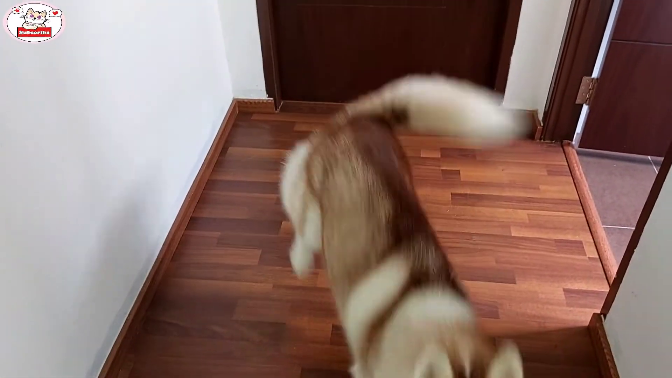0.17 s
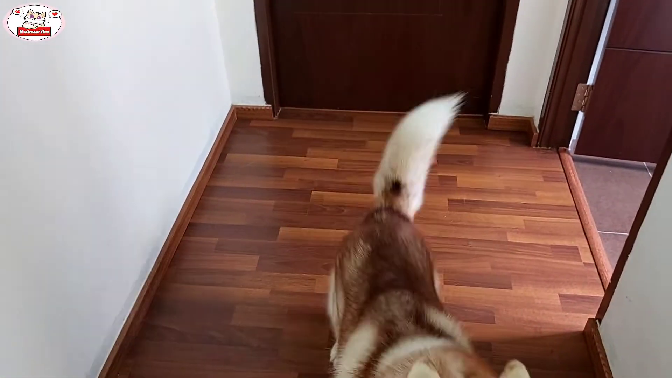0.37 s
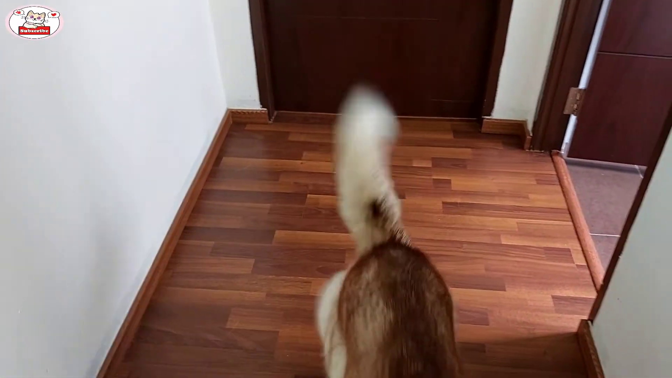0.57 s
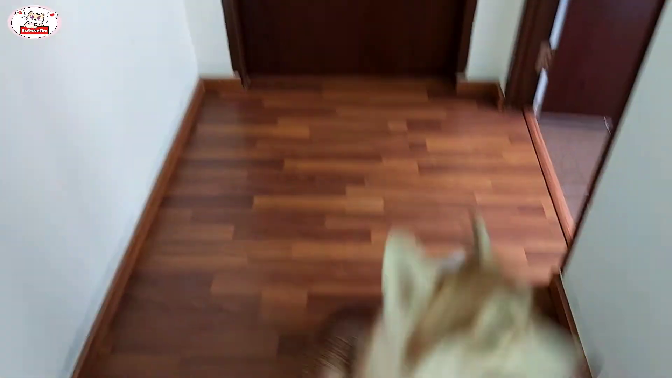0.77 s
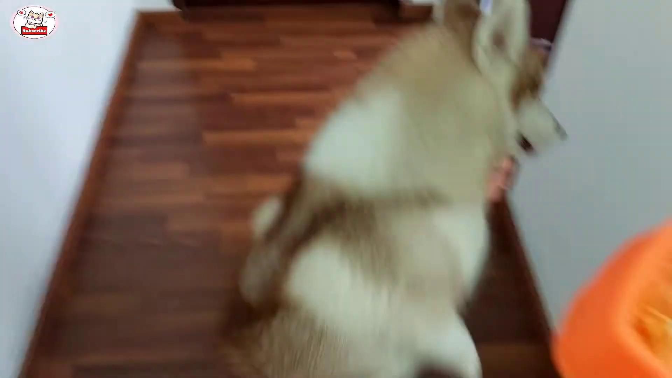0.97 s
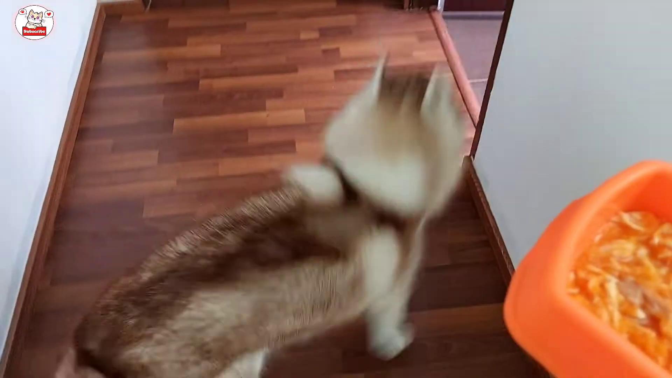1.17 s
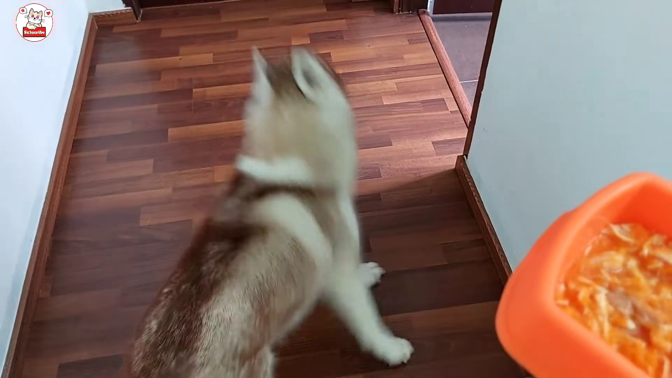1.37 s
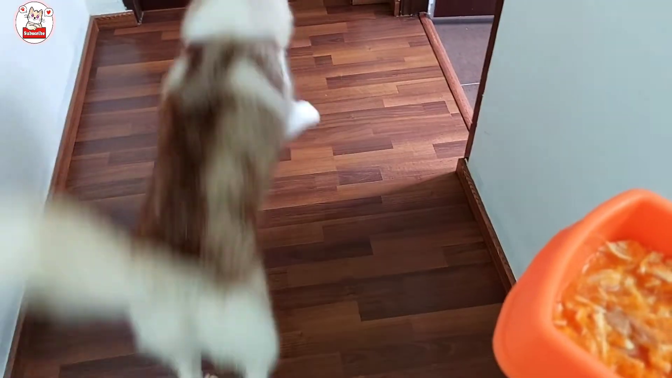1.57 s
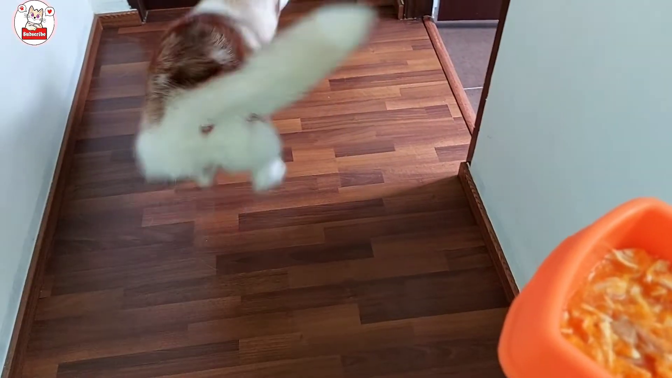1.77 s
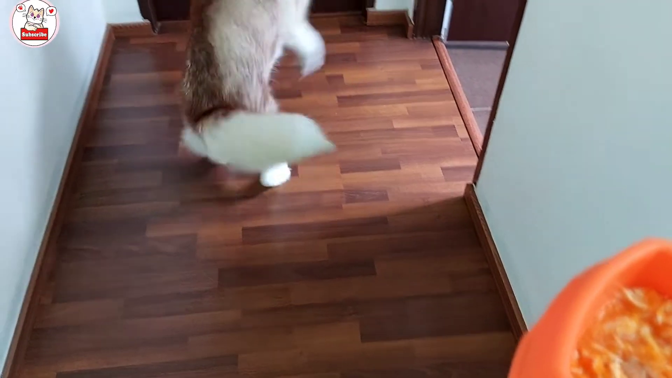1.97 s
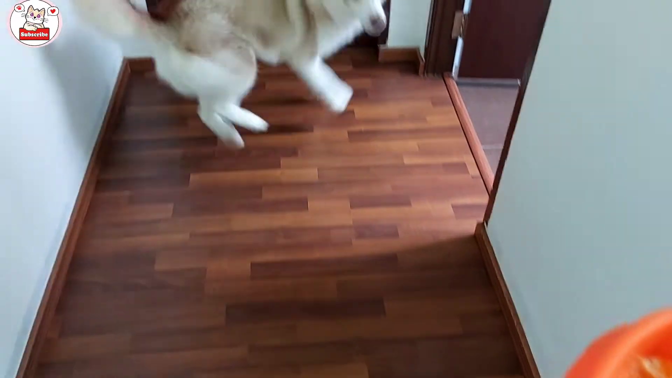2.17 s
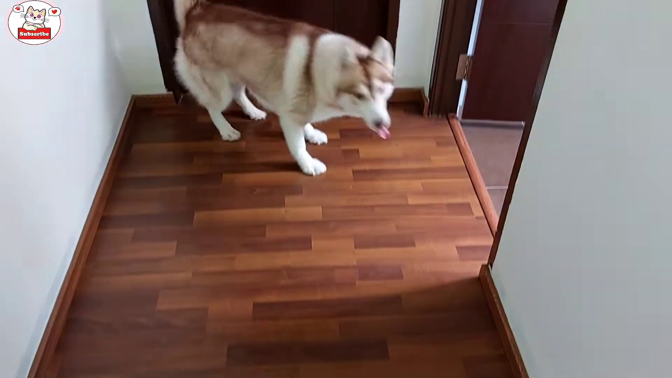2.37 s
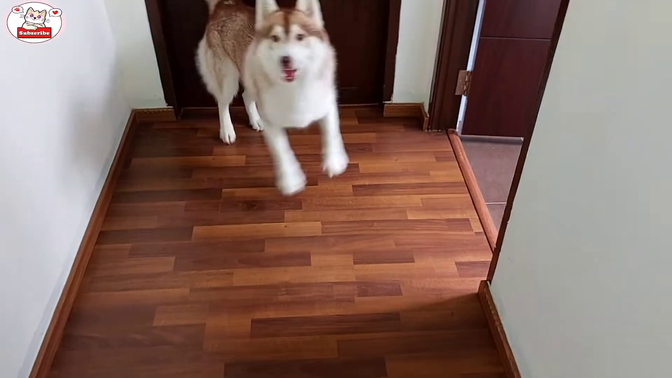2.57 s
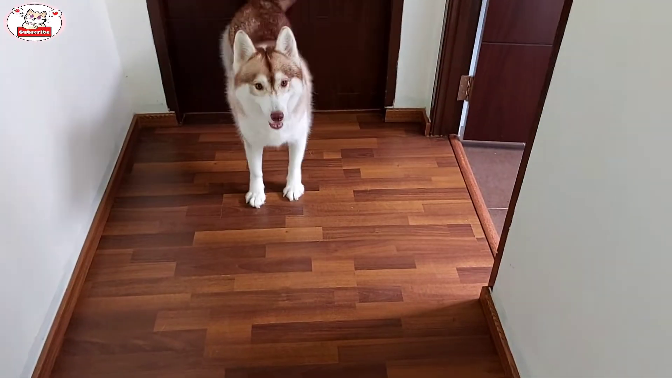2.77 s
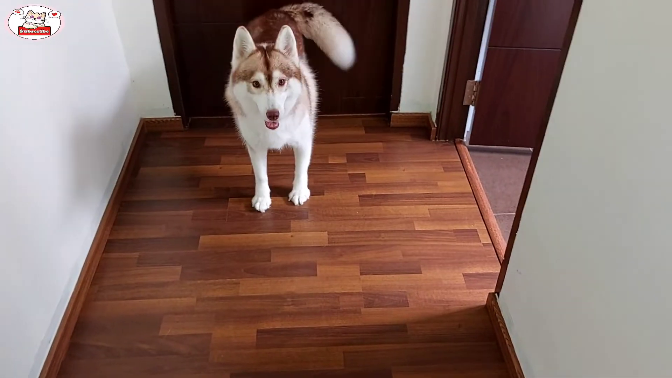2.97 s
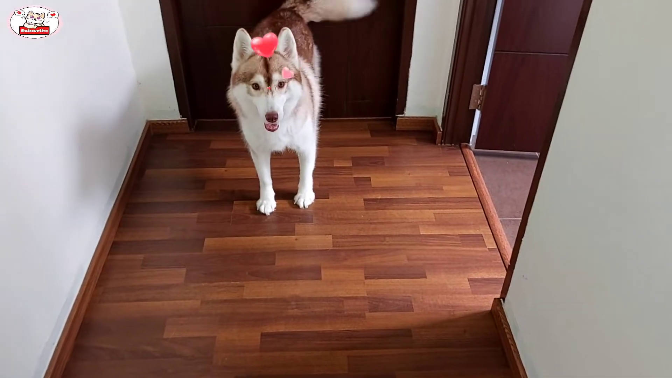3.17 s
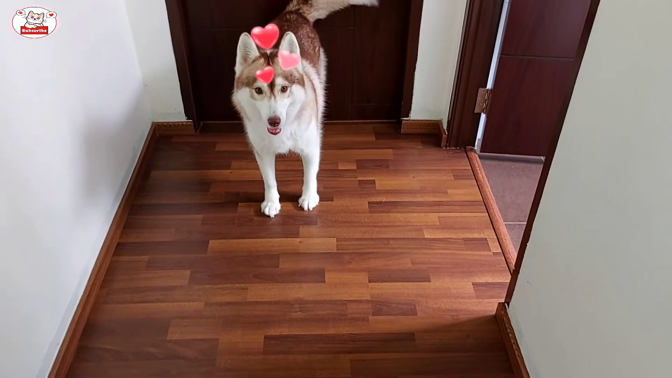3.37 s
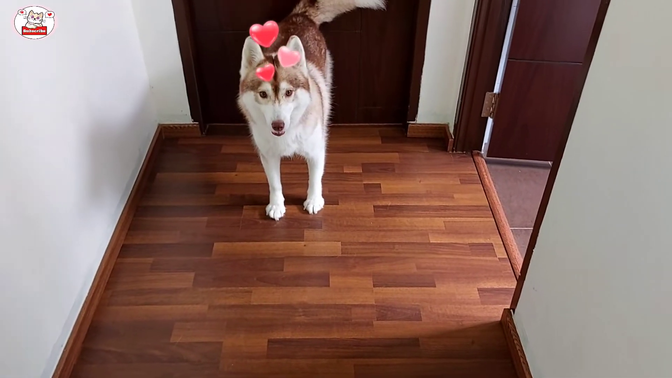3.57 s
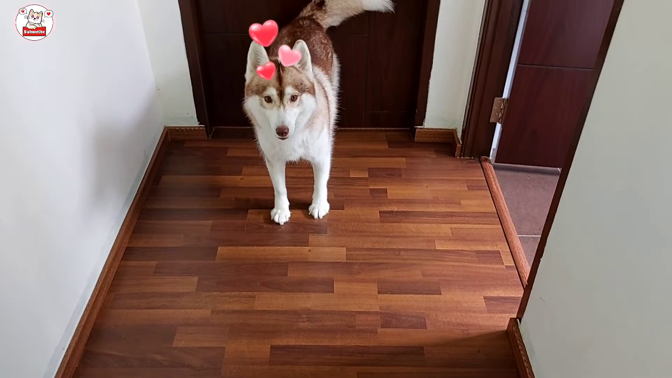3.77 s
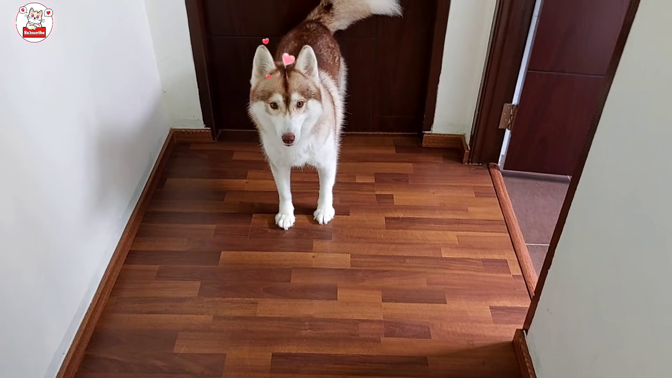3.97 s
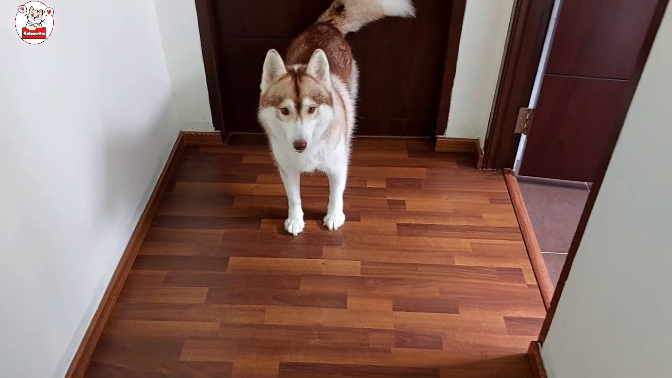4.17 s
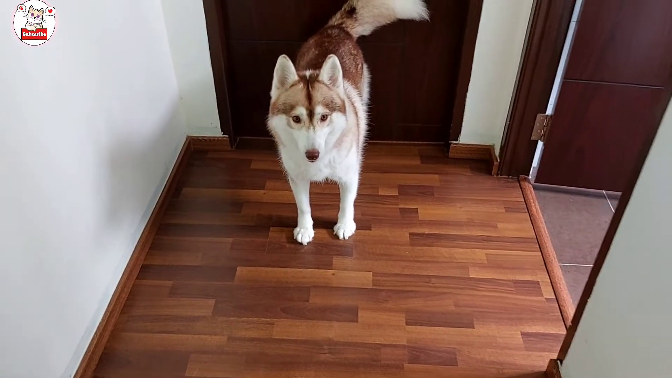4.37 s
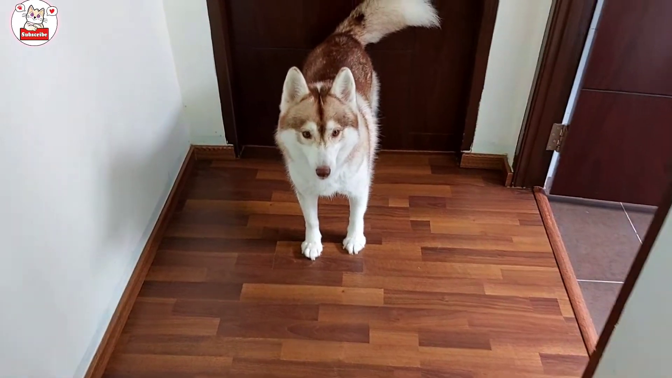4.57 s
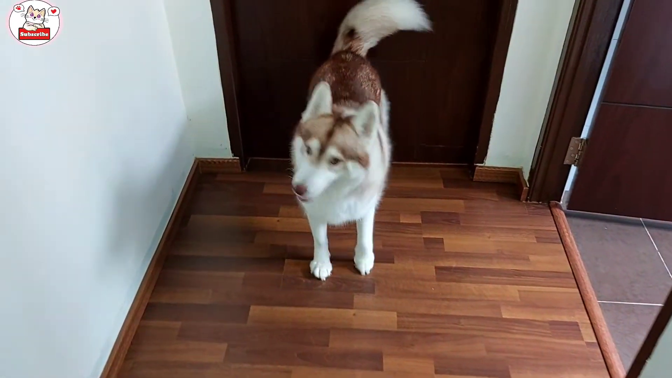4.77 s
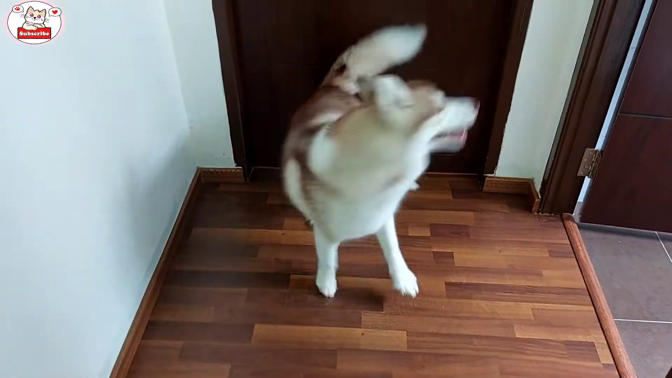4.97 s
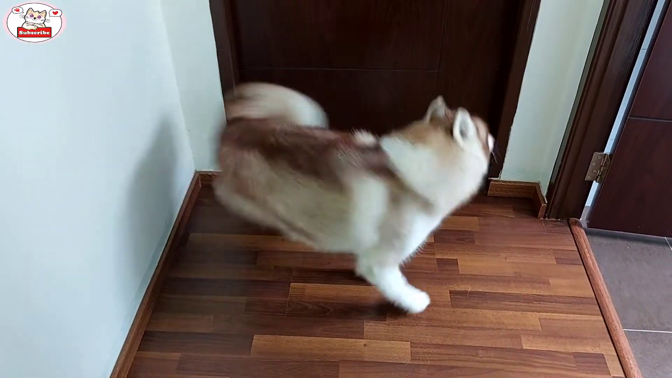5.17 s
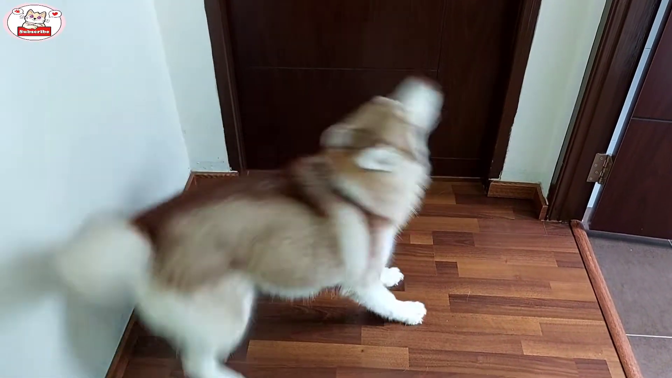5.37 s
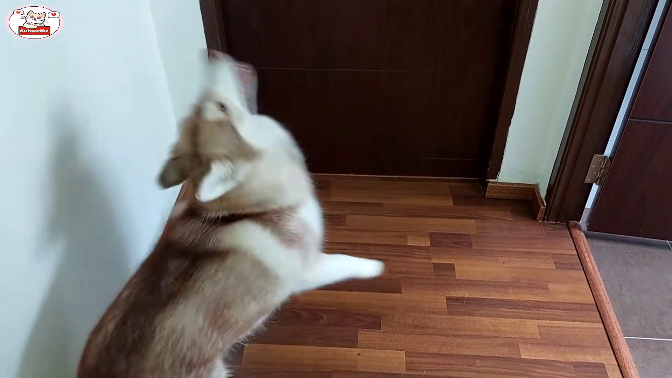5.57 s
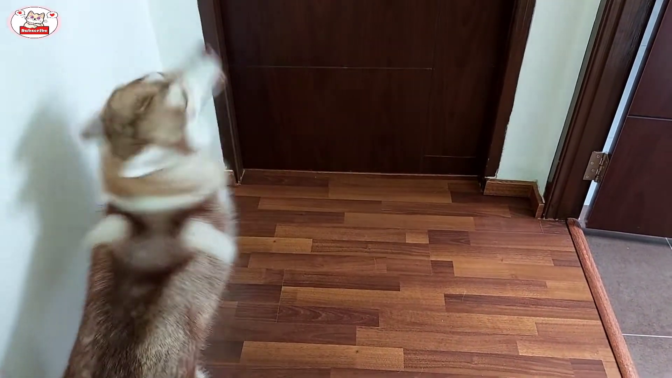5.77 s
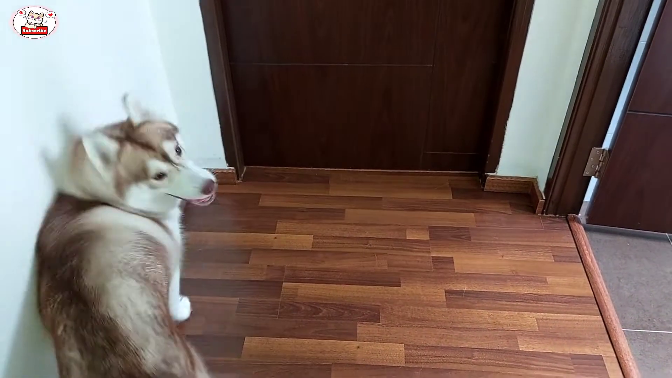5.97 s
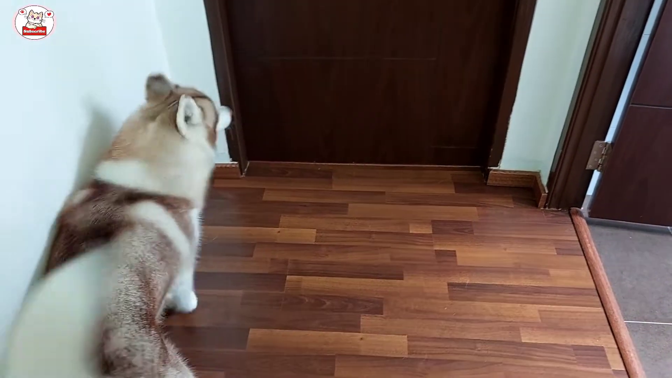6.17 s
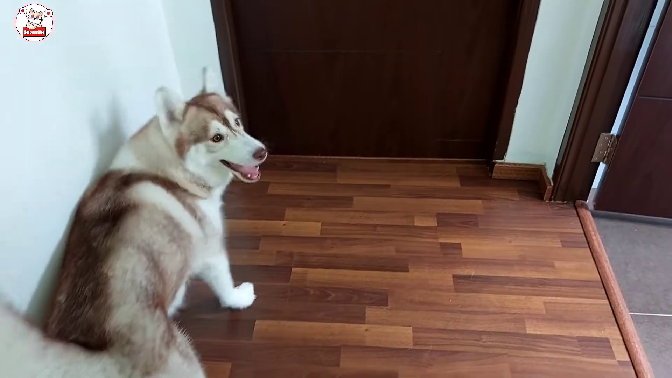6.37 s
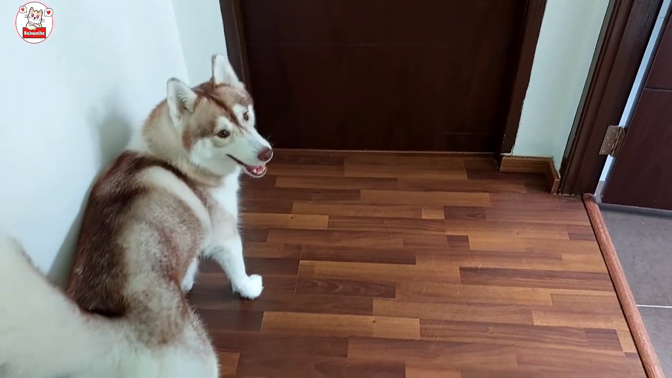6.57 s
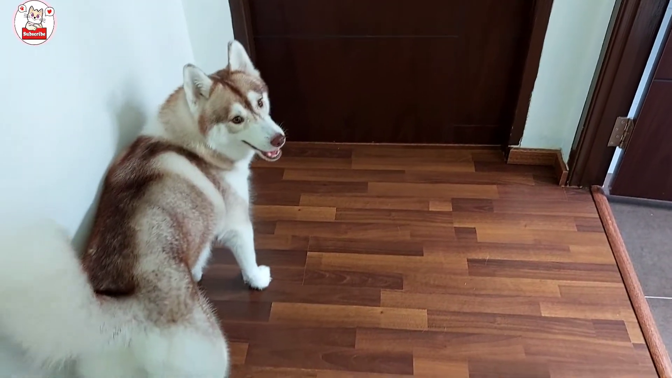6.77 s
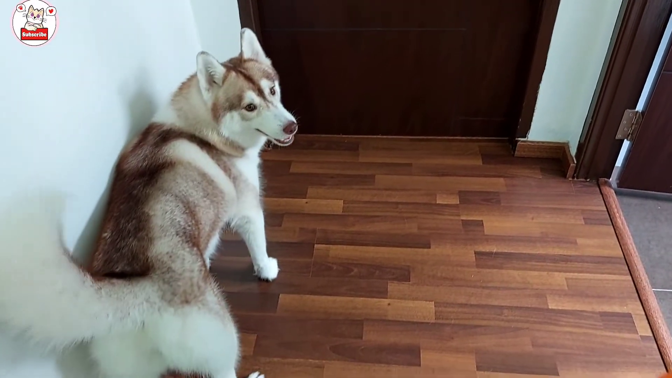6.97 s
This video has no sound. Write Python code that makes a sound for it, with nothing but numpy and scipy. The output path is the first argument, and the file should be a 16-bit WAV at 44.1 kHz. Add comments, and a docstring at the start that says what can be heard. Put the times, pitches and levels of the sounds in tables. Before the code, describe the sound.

A big husky spins and hops on laminate in a bare hallway. Sharp claw ticks, gritty skids, knocking paw pads and low floor booms come in an irregular flurry for about three seconds, with soft huffs. A near-silent pause leaves only low appliance hum, then a second, sparser scramble brings more huffs. Close stereo microphone, bright lively echo.

```python
"""Claws tick and skid on laminate as an excited dog spins and hops in a bare, echoing hallway.
A claw is a broadband impulse and scratch, a paw pad a blow that rings the boards, a slide a train of
random clicks, and a huff turbulent noise through throat and mouth resonances. The floor booms, diffuse
echo and standing waves answer, and an appliance hums over the air noise of the house.
Two microphone ports a hand apart hear it with small differences of level, delay and colour."""
import sys
import numpy as np
from scipy import signal
from scipy.fft import rfft, irfft
from scipy.io import wavfile

SR = 44100
rng = np.random.default_rng(int(sys.argv[2]) if len(sys.argv) > 2 else 0)


def file_out(sig):
    """Save sig as 16-bit WAV at sys.argv[1]."""
    # one column per channel
    cols = np.atleast_2d(sig).T
    # limit, then scale
    lim = np.clip(cols, -1, 1)
    pcm = np.round(lim * 32767).astype(np.int16)
    wavfile.write(sys.argv[1], SR, pcm)


N = 308700

# Relative spectral density of claw on laminate: (f/Hz, level/dB)
CLAW_SPECTRUM = [(530, -6), (900, 2.5), (1250, -6.5), (1880, -2.5), (3430, -1), (4860, 5), (6410, -1.5),
                 (11800, -5), (15100, -5), (16000, -53)]


def from_db(db):
    """Amplitude ratio of a level: 20 dB is a factor of ten."""
    return 10 ** (np.asarray(db) / 20)


def rms_one(x):
    """Normalisation to unit root-mean-square amplitude."""
    return x / np.sqrt(np.mean(x ** 2) + 1e-20)


def at_hz(points, hz):
    """Interpolation of a curve along logarithmic frequency."""
    points = np.array(points)
    return np.interp(np.log(hz), np.log(points[:, 0]), points[:, 1])


def drift(rate_hz):
    """Low-passed noise: a random fluctuation of unit spread, with a double pole at rate_hz."""
    step = 40                                   # samples between computed values
    warm_up = 2000                              # values dropped while the filter settles
    r = np.exp(-2 * np.pi * rate_hz * step / SR)
    white = rng.standard_normal(N // step + warm_up + 2)
    slow = signal.lfilter([1], [1, -2 * r, r * r], white)[warm_up:]
    return np.interp(np.arange(N) / step, np.arange(len(slow)), rms_one(slow))


def resonator(hz, width_hz):
    """Two-pole resonance: numerator and denominator for a gain of about 1 at the peak."""
    r = np.exp(-np.pi * width_hz / SR)
    zeros = [(1 - r * r) / 2, 0, (r * r - 1) / 2]
    return zeros, [1, -2 * r * np.cos(2 * np.pi * hz / SR), r * r]


def resonate(x, hz, width_hz):
    """Forced response of one fixed resonance."""
    return signal.lfilter(*resonator(hz, width_hz), x)


def moving_resonance(x, centre_hz, width_hz):
    """Time-varying resonance: its centre glides in steps of 256 samples and its state carries over."""
    state, y = np.zeros(2), np.zeros(N)
    for i in range(0, N, 256):
        zeros, poles = resonator(centre_hz[i], width_hz)
        y[i:i + 256], state = signal.lfilter(zeros, poles, x[i:i + 256], zi=state)
    return y


def ring(length, hz, t60):
    """Free damped vibration: a sine that falls by 60 dB in t60 seconds."""
    t = np.arange(length) / SR
    return np.sin(2 * np.pi * hz * t) * from_db(-60 * t / t60)


def grains(per_s, spread_db):
    """Poisson-like impulse train: random clicks of uneven size and either sign."""
    sizes = from_db(spread_db * np.minimum(rng.exponential(1, N), 5))
    sizes = sizes * rng.choice([-1, 1], N)
    return sizes * (rng.random(N) < per_s / SR) + 1e-9


def coloured(x, spectrum, tilt_db=0):
    """Spectral shaping: a curve plus a tilt in dB per octave, zero at 4 kHz and level below 1 kHz."""
    hz = np.maximum(np.fft.rfftfreq(len(x), 1 / SR), 10)
    tilt = tilt_db * np.log2(np.maximum(hz, 1000) / 4000)
    return irfft(rfft(x) * from_db(at_hz(spectrum, hz) + tilt), len(x))


def bands(length):
    """Spatial coherence of a diffuse field: half-octave stereo noise, more alike in bass than treble."""
    # Left-right correlation of diffuse sound: (f/Hz, correlation)
    likeness = [(60, 0.36), (130, 0.61), (250, 0.9), (500, 0.54), (1000, 0.12), (4000, 0.014)]
    white = rng.standard_normal((2, 2, length))       # neighbouring bands take turns at two noises
    edges = 25 * 2 ** np.arange(0, 9.6, .5)
    for k, (low, high) in enumerate(zip(edges, edges[1:])):
        band_pass = signal.butter(2, [low, high], "band", fs=SR, output="sos")
        mid, side = signal.sosfilt(band_pass, white[k % 2])
        hz = np.sqrt(low * high)
        alike = np.clip(at_hz(likeness, hz), -1, 1)
        yield hz, np.sqrt(1 + alike) * mid + np.sqrt(1 - alike) * side * [[1], [-1]]


def swell(start, length, attack_s, t60):
    """Envelope of one effort: squared rise, hold until its length is over, exponential decay."""
    age = np.arange(N) / SR - start
    decay = from_db(-60 * np.maximum(age - length, 0) / t60)
    return np.clip(age / attack_s, 0, 1) ** 2 * decay


def claws():
    """Impulse excitation: each strike is a sharp crack and a gritty scratch that swells and dies.
    Returns what reaches the two ports and the blow that fills the hall."""
    # Claw strikes: (t/s, relative strength/dB, lean to the left/dB before clipping and port weights,
    # tilt/dB per octave)
    strike_list = [(0.023, -17.5, -5, -4), (0.129, -1.5, -2, -1.5), (0.3106, -4.5, 2.5, -1),
                   (0.384, -13, -2, -1), (0.5314, -6, -2, 0), (0.67, -17.5, 3, 7),
                   (0.7108, 0.5, -0.5, -0.5), (0.746, -5, 1, 1), (0.886, -13.5, 9, -0.5),
                   (1.051, -11.5, 6, -2), (1.2005, 3, 3, 0), (1.205, -10.5, 6.5, -2.5),
                   (1.613, -16.5, -1.5, -1.5), (1.6826, -1, 5, -2), (1.711, -9.5, 6, -1),
                   (1.9149, -11.5, 0, -4), (1.921, -5.5, -5.5, 1.5), (2.0454, -11, 0, -1.5),
                   (2.057, -4, -4, 0.5), (2.1499, -16, -4.5, -2), (2.2349, -4.5, 7.5, -1),
                   (2.245, 1.5, 5, -0.5), (2.652, -5, -3, 0), (2.673, -0.5, 3, 0), (2.7796, -15.5, 0, -4),
                   (3.0149, -15.5, -1, -2), (4.044, -56, 5, 1.5), (4.9301, -10, -0.5, -4.5),
                   (5.007, -9, -2, -1.5), (5.1108, -9.5, -3, 0), (5.1679, -10, -4, -1.5),
                   (5.223, -3.5, 2, -0.5), (5.4044, -11.5, -0.5, -1), (5.4266, -2.5, -2.5, 0),
                   (5.9874, -8.5, 6, 1), (6.036, -6.5, -10.5, -4), (6.0706, 1.5, 2.5, 1),
                   (6.334, -2, 2, -1)]
    scratch_s, grit_db = .007, 8      # decay time and unevenness of the scratch
    scratch_db = 4.5                  # energy of the scratch against the crack
    lag_s_per_db = .00003
    size, lead = 2048, 128
    out = np.zeros((3, N + size))
    t = np.arange(size) / SR
    age = t / scratch_s
    crack = (t == 0) * 1.
    whole = crack * np.hypot(1, from_db(scratch_db))      # the energy of both, in one blow
    noise = rng.standard_normal((len(strike_list), size))
    grit = rng.standard_normal((len(strike_list), size // 16))
    for (s, level_db, lean_db, tilt_db), hiss, rough in zip(strike_list, noise, grit):
        scratch = from_db(grit_db * np.repeat(rough, 16)) * hiss * np.minimum(8 * age, 1) * np.exp(-age)
        scratch = from_db(scratch_db) * scratch / np.linalg.norm(scratch)
        side = np.clip(lean_db, -9, 9)
        # rows: left port, right port, hall
        for row, (weight, burst) in enumerate([(0.64, crack + scratch), (-0.71, crack + scratch), (0, whole)]):
            tick = coloured(np.roll(burst, lead), CLAW_SPECTRUM, tilt_db)
            tick = np.roll(tick, 6 - lead)[:size - lead]      # six samples stay ahead of the crack
            at = round((s - weight * side * lag_s_per_db) * SR)      # the nearer port: louder and sooner
            out[row, at:at + len(tick)] += from_db(level_db + weight * side / 2) * tick
    return out[:2, :N], out[2, :N]


def thuds():
    """Modal response to a blow: a pad rings the board briefly and the body's weight adds a bass push."""
    # Paw landings: (t/s, board ringing level/dB, board f/Hz, low push level/dB)
    landings = [(0.128, -8.5, 403, -54), (0.161, -3, 590, -39.5), (0.171, -5.5, 489, -50),
                (0.191, -9, 587, -33), (0.264, -23.5, 500, -58), (0.305, -7.5, 481, -43),
                (0.519, -5.5, 561, -34), (0.549, -18.5, 595, -51.5), (0.599, -12, 496, -45),
                (0.719, -25.5, 594, -35.5), (0.96, -17.5, 590, -66), (0.988, -14, 623, -49.5),
                (1.2, -3, 445, -61.5), (1.242, -2.5, 489, -33.5), (1.269, -15.5, 530, -48),
                (1.297, -12, 548, -44), (1.339, -16.5, 310, -43.5), (1.496, -25, 248, -55),
                (1.684, -24.5, 302, -43), (1.733, -6.5, 319, -32.5), (1.759, -29, 322, -51),
                (1.809, -26.5, 300, -33.5), (1.84, -29, 304, -43.5), (1.919, -14, 560, -60),
                (1.969, -16, 590, -38.5), (2.252, -11.5, 558, -29.5), (2.289, -9.5, 598, -56.5),
                (2.419, -17.5, 339, -41), (2.504, -20, 350, -39), (2.655, -22.5, 660, -47),
                (2.681, -13, 500, -54), (3.017, -29.5, 314, -51), (3.304, -29.5, 353, -52.5),
                (4.916, -22, 630, -43.5), (5.222, -23.5, 313, -44), (5.405, -20, 253, -37),
                (5.434, -15.5, 568, -63.5), (6.06, -16, 265, -40), (6.336, -19.5, 292, -31.5)]
    board_t60_s, push_hz, push_t60_s = 0.028, 135.5, 0.16
    size = 8192
    out = np.zeros(N + size)
    low = ring(size, push_hz, push_t60_s)
    soft = 1 - np.exp(-np.arange(size) / SR / 0.0019)      # the pad cushions the onset
    for s, level_db, hz, low_db in landings:
        board = ring(size, hz, board_t60_s)
        board += 0.32 * ring(size, .62 * hz, board_t60_s)
        board += 0.21 * ring(size, 1.38 * hz, 1.1 * board_t60_s)
        at = round(s * SR)
        out[at:at + size] += soft * (from_db(level_db) * board + from_db(low_db) * low)
    return out[:N]


def shuffles():
    """Stick-and-bump friction: uneven pad bumps excite the boards; claws scrape as dense fine clicks."""
    # Paw slides: (start t/s, length/s, pad rumble level/dB, claw scrape level/dB)
    slides = [(-.03, 0.033, -37, -47), (.13, .08, -47.5, -42), (0.262, 0.069, -40.5, -49.5),
              (0.457, .05, -46, -59), (0.519, 0.18, -36.5, -37.5), (0.745, 0.13, -43, -39),
              (0.986, 0.079, -42.5, -45.5), (1.18, 0.05, -50.5, -56), (1.23, 0.042, -55, -40),
              (1.337, 0.076, -39.5, -48.5), (1.695, 0.048, -31, -40.5), (1.8, 0.193, -46.5, -51.5),
              (1.948, 0.071, -47, -53), (2.103, 0.044, -61.5, -52.5), (2.218, 0.065, -36, -57),
              (2.32, 0.089, -58, -48), (2.46, 0.19, -46.5, -50), (2.594, 0.054, -38, -56),
              (2.84, 0.037, -57.5, -66), (3.023, 0.09, -48, -77), (4.749, 0.11, -50.5, -53.5),
              (4.87, 0.13, -42, -48.5), (5.09, 0.098, -48, -53.5), (5.196, 0.037, -41, -40),
              (5.373, 0.035, -42, -75), (5.556, 0.15, -36.5, -45), (5.976, 0.11, -32.5, -58.5),
              (6.14, 0.055, -54, -43), (6.273, 0.098, -51, -60.5), (6.384, 0.11, -49, -62),
              (6.52, 0.038, -51.5, -73)]
    # Board resonances under a dragged pad: (f/Hz, width/Hz, relative level/dB)
    boards = [(317.6, 130, 3), (500, 270, -2), (636, 123, 7), (856, 72, -2)]
    attack_s, t60_s = .025, 0.27
    bumps = grains(350, spread_db=8.0)
    rumble = 0
    for k, (hz, width, db) in enumerate(boards):
        mode = resonate(resonate(bumps, hz, width), hz, 2 * width)
        rumble = rumble + (-1) ** k * from_db(db) * mode      # alternate signs
    scrape = coloured(grains(3000, spread_db=6.0), CLAW_SPECTRUM, tilt_db=-4.0)
    scrape = signal.sosfilt(signal.butter(2, 1300, "high", fs=SR, output="sos"), scrape)
    pad, claw = sum(from_db([[pad_db], [claw_db]]) * swell(s, length, attack_s, t60_s)
                    for s, length, pad_db, claw_db in slides)
    return pad * rms_one(rumble) + claw * rms_one(scrape)


def floor_boom():
    """Random excitation of low modes: the shifting weight shakes the whole floor."""
    # Level of the boom in each of two bouts of spinning: lists of (t/s, level/dB)
    bouts = [
        [(0.0, -77), (0.2, -48), (0.51, -57), (0.53, -42), (0.75, -41.5), (1.15, -62), (1.26, -45), (1.68, -72),
         (1.72, -62), (2.03, -49), (2.06, -67), (2.49, -39.5), (3.1, -76)],
        [(4.75, -57), (5.06, -55.5), (5.51, -52), (5.63, -68), (5.65, -54), (5.96, -57), (6.06, -52.5),
         (6.36, -60), (6.38, -59), (6.47, -59), (6.63, -80), (6.67, -61), (6.8, -78.5)],
    ]
    shake, t = rng.standard_normal(N), np.arange(N) / SR
    boom = resonate(resonate(shake, 76, 25), 68, 40)
    boom += .3 * resonate(resonate(shake, 61, 12), 54, 30)
    gain = sum(from_db(np.interp(t, *np.transpose(bout), left=-120, right=-120)) for bout in bouts)
    return gain * rms_one(boom)


def huffs():
    """Source and filter: turbulent breath through steady throat resonances and a moving mouth one."""
    # Huffs of the dog: (start t/s, rise/s, length/s, level/dB, mouth f/Hz at start, mouth f/Hz at end,
    # throat gain against mouth/dB, fade t60/s)
    efforts = [(1.765, 0.039, 0.08, -38.5, 1653, 1780, 3.5, .2),
               (2.537, .03, 0.083, -32, 1400, 1562, -1, 0.3),
               (3.13, 0.022, 0.076, -47.5, 1548, 1620, -6.5, 0.34),
               (4.704, 0.063, 0.1, -43.5, 1600, 1940, -5, .4),
               (5.578, .03, 0.12, -34.5, 1710, 2012, -3.5, 0.11),
               (5.979, 0.022, 0.044, -30, 1620, 1700, -5.5, 0.26),
               (6.044, 0.016, 0.046, -32.5, 1700, 1600, -10.5, 0.66),
               (6.372, 0.038, 0.074, -39.5, 1745, 1670, -9.5, 0.49)]
    # Steady throat resonances: (f/Hz, width/Hz, relative level/dB)
    throat_modes = [(930, 260, -2), (2200, 350, -8), (2620, 200, -4), (3150, 300, -7), (4600, 1500, -20)]
    mouth_width_hz, flutter_db = 200, 2.8
    breath = rng.standard_normal(N) * from_db(flutter_db * drift(74.0))      # airway flutter roughens it
    start, rise, length, level_db, first_hz, last_hz, throat_db, t60 = np.transpose(efforts)
    t = np.arange(N) / SR
    now = np.maximum(np.searchsorted(start, t) - 1, 0)      # the huff under way
    progress = np.clip((t - start[now]) / length[now], 0, 1)
    centre = first_hz[now] + (last_hz - first_hz)[now] * progress
    mouth = moving_resonance(breath, centre, mouth_width_hz)
    mouth = moving_resonance(mouth, centre, 4 * mouth_width_hz)
    throat = 0
    for k, (hz, width, db) in enumerate(throat_modes):
        mode = resonate(resonate(breath, hz, width), hz, 4 * width)
        throat = throat + (-1) ** k * from_db(db) * mode
    gain = sum(from_db(db) * swell(s, hold, up, fade)
               for s, up, hold, db, fade in zip(start, rise, length, level_db, t60))
    return gain * (mouth - from_db(throat_db[now]) * throat) / np.std(mouth)


def hallway(x):
    """Reverberation: near walls answer at once, then diffuse echo dies band by band over bass standing waves.
    The dog keeps moving, so the sound is dealt in turn to three places with echoes of their own."""
    # Decay time of the diffuse echo: (f/Hz, t60/s)
    decay_times = [(60, 0.19), (150, 1), (400, 0.63), (900, 0.78), (1700, 0.81), (2900, 0.74), (6000, 0.6),
                   (10000, 0.62), (16000, 0.043)]
    # Standing waves: (f/Hz, relative level/dB, t60/s)
    modes = [(57.3, -9, 0.35), (75.7, -17, 0.27), (132.1, -8, 0.58), (161.7, -10, 1), (258, -7, 0.63),
             (310, -15, 0.34), (491, -9.5, 0.48), (568.5, -13.5, .4)]
    move_s = 1.1      # time the dog takes to come back to a place
    size, out = int(1.2 * SR), 0
    t, turn = np.arange(size) / SR, np.pi * np.arange(N) / SR / move_s
    standing = 0.003 * sum(from_db(db) * ring(size, hz, t60) for hz, db, t60 in modes)
    for place in range(3):
        echo = sum(band * from_db(-60 * t / at_hz(decay_times, hz)) for hz, band in bands(size))
        echo = echo * (1 + 1.1 * np.exp(-t / 0.014))      # stronger early on, from the near walls
        echo = echo / np.sqrt(np.sum(echo ** 2) / 2)      # unit energy per port
        echo = (echo + standing) * np.clip((t - .001) / 0.0041, 0, 1)
        share = np.sqrt(2 / 3) * np.abs(np.cos(turn + place * np.pi / 3))      # total power constant
        out = out + signal.fftconvolve((share * x)[None], echo, axes=1)[:, :N]
    return out


def house():
    """Stationary background: steady sines share a wavering level as appliance hum, over diffuse air noise."""
    # Hum partials: (f/Hz, rms level/dB before the wavering)
    partials = [(53.8, -71.5), (129.2, -63.5), (263.8, -56), (398.4, -72.5), (463.0, -74.5), (1050, -85)]
    # Relative spectral density of the house's air noise: (f/Hz, level/dB)
    air_spectrum = [(25, -17.5), (55, -22), (130, -12.5), (190, -9.5), (260, -7.5), (400, -21.5),
                    (600, -23), (1000, -32), (1500, -40.5), (2500, -46.5), (5000, -52.5), (8000, -48.5),
                    (11000, -47), (16000, -52)]
    t = np.arange(N) / SR
    waver = from_db(0.77 * drift(5.5))
    hum = waver * sum(np.sqrt(2) * from_db(db) * np.sin(2 * np.pi * hz * t) for hz, db in partials)
    air = sum(from_db(at_hz(air_spectrum, hz)) * band for hz, band in bands(N))
    return hum + from_db(-55) * rms_one(air)


def scene():
    """Superposition: direct sound with its delay between the ports, plus the hall, floor and house."""
    ticks, strikes = claws()
    blows, drag, breath = thuds(), shuffles(), huffs()
    body = blows + drag + breath
    port_lag_s = 0.00022
    late = np.interp(np.arange(N) - port_lag_s * SR, np.arange(N), body)      # later at the left port
    into_hall = from_db(6.0) * strikes + from_db(1.0) * blows
    into_hall += from_db(6.0) * drag + from_db(-2) * breath
    return ticks + np.array([late, body]) + hallway(into_hall) + floor_boom() + house()


def record(dry):
    """Linear filtering: the ports differ a little in colour, deep bass falls away and the top is cut."""
    # Colour of the right port against the left, split evenly between them: (f/Hz, level/dB)
    port_colour = [(500, 0.2), (2000, 0.1), (4500, 2.5), (9000, 4.5), (14000, -3)]
    hz = np.maximum(np.fft.rfftfreq(N, 1 / SR), 10)
    ports = irfft(rfft(dry) * from_db(at_hz(port_colour, hz) * np.array([[-.5], [.5]])), N)
    ports = signal.sosfilt(signal.butter(3, 45, "high", fs=SR, output="sos"), ports)
    return signal.sosfilt(signal.cheby2(12, 70, 16700, fs=SR, output="sos"), ports)


dry = scene()
out = record(dry)
file_out(out)
```